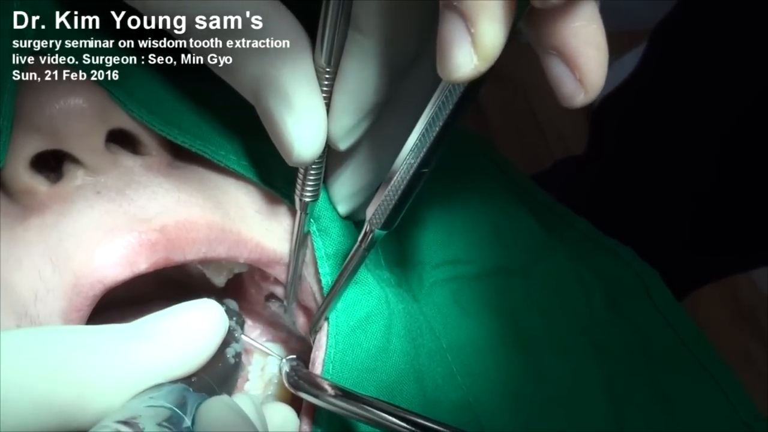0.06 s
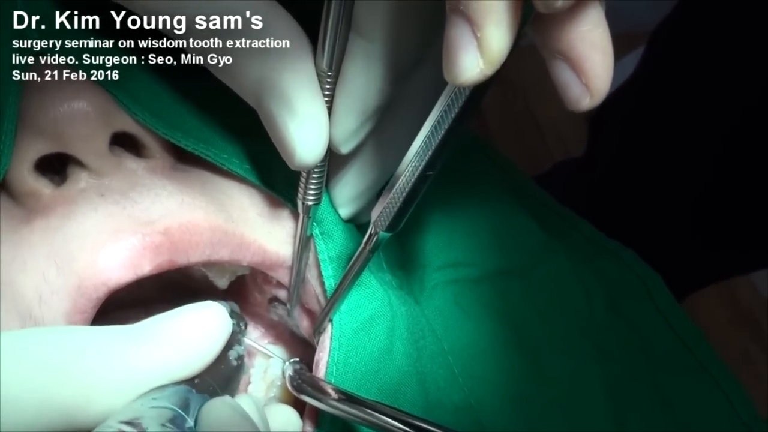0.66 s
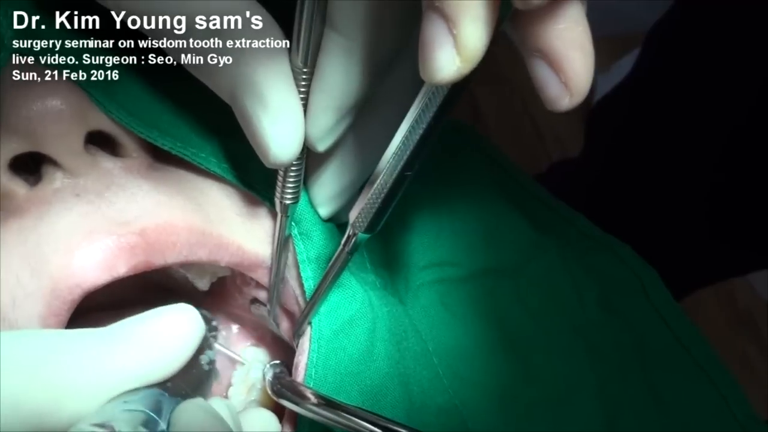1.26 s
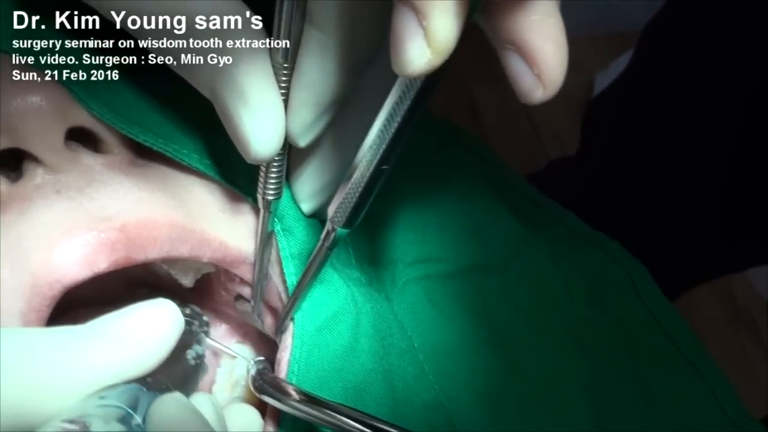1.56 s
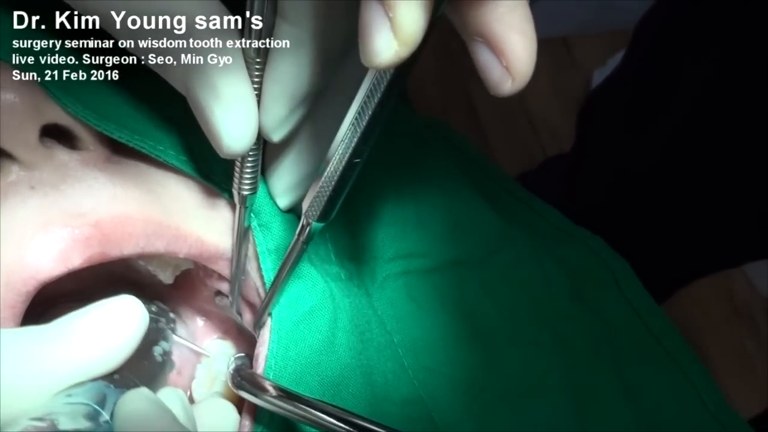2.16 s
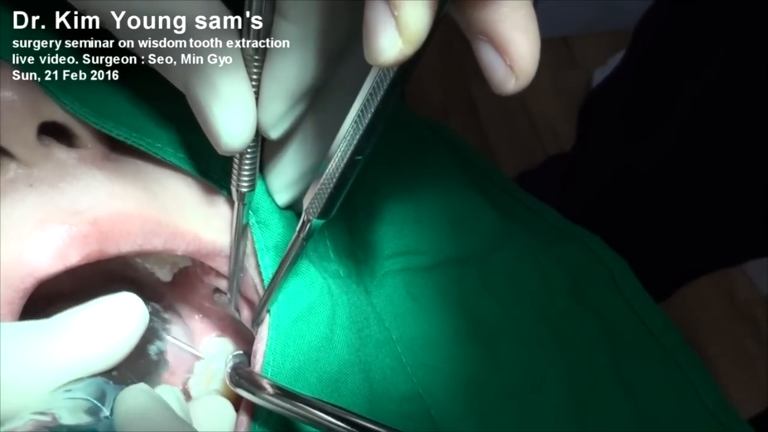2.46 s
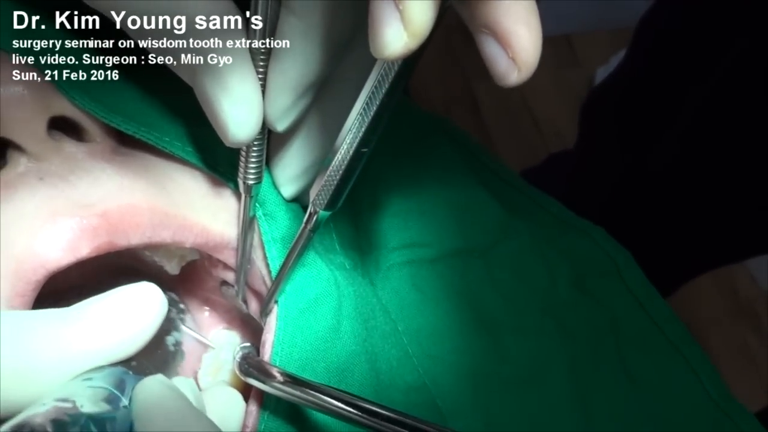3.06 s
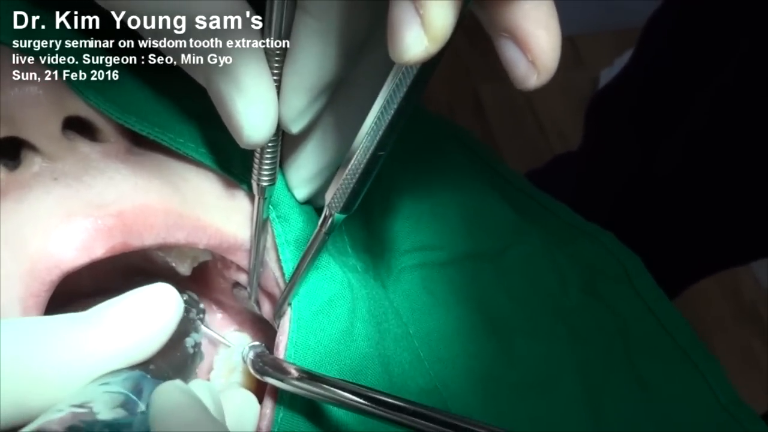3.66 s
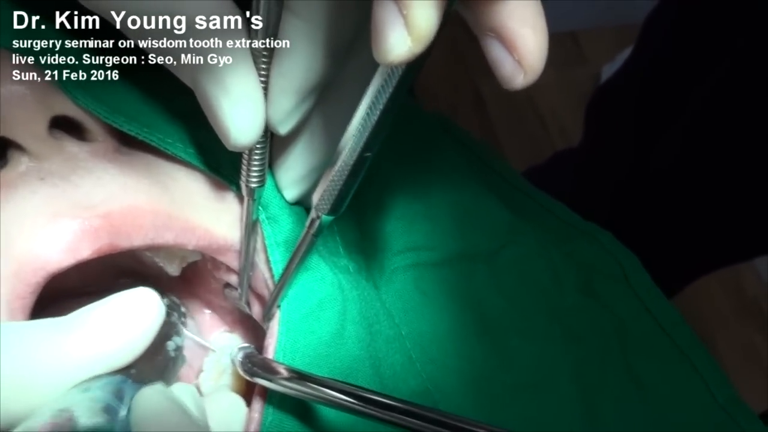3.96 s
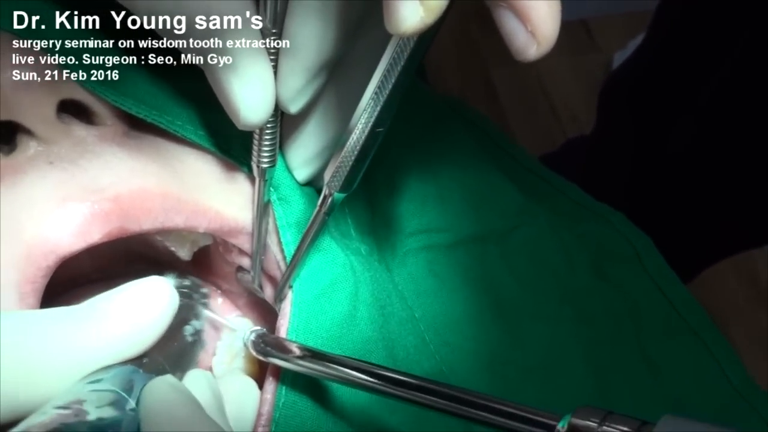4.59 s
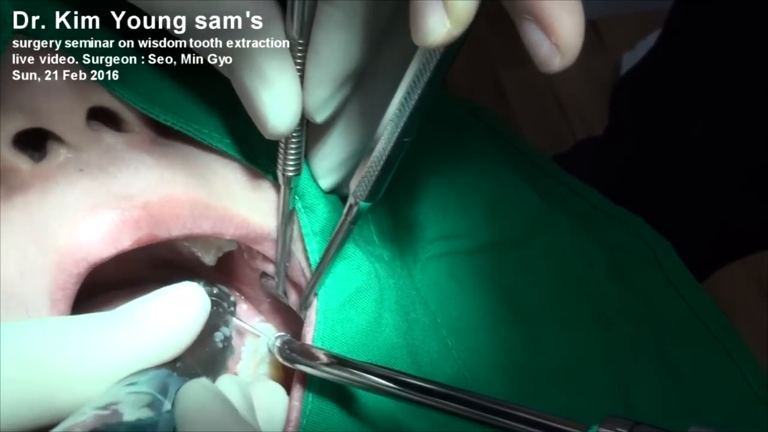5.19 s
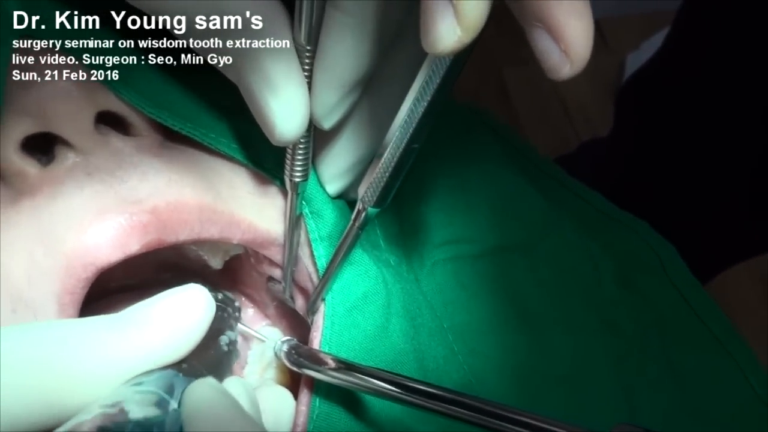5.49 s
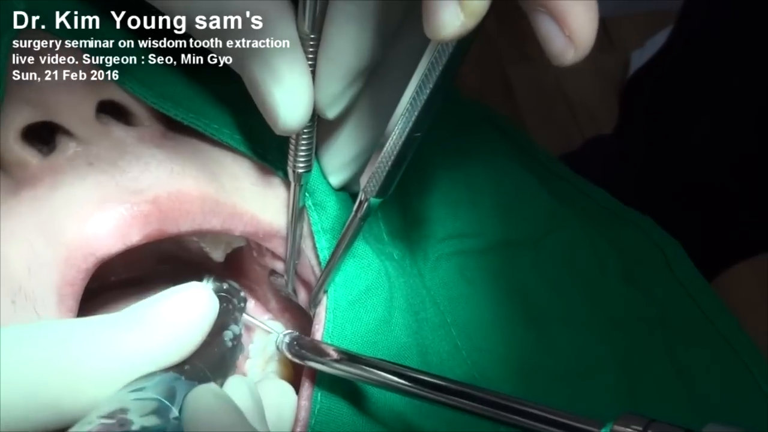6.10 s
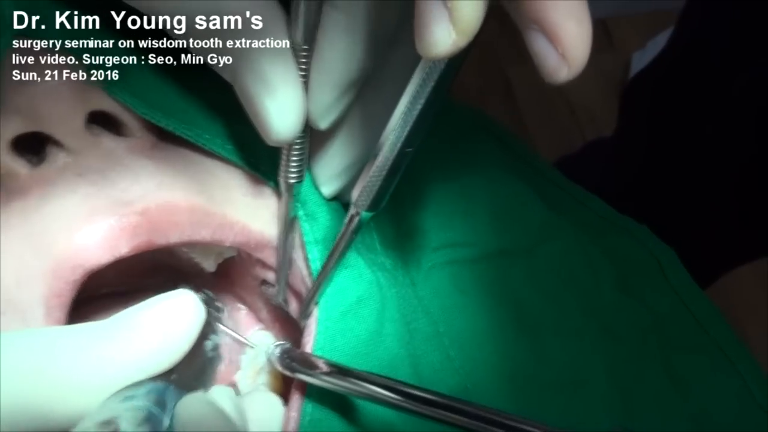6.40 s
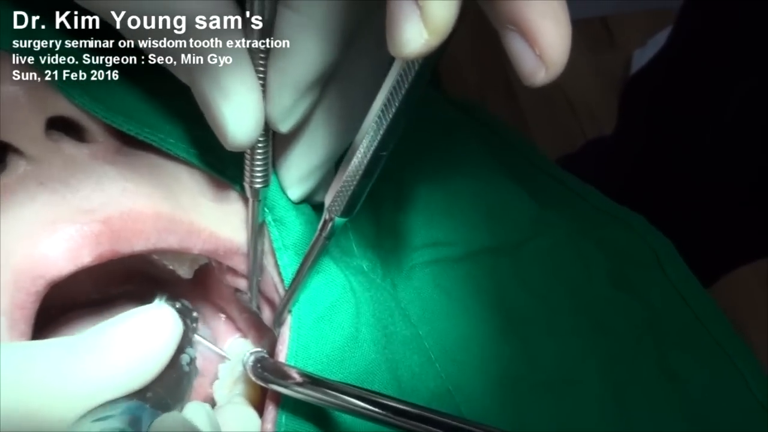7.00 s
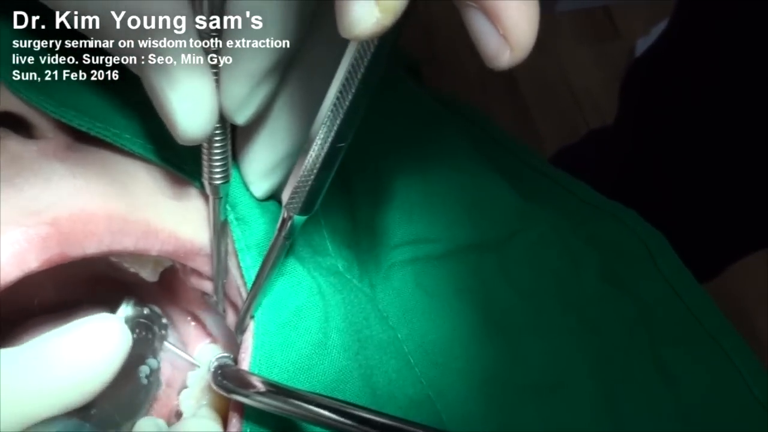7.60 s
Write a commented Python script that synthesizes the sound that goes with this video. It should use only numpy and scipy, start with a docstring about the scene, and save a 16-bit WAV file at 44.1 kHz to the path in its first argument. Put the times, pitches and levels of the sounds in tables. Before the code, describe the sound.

A dental drill whistles high and dips in pitch with each short stroke on a tooth, over steady suction roar and hissing spray.

```python
"""A suction tip roars in an open mouth under hissing air and spray, and at once a dental turbine whistles.
Its rotor runs near 5000 turns a second, sags with each short stroke of the bur and twice nearly stalls.
The bur chatters and rasps as it catches on enamel; passing water makes the suction flutter and gulp.
All is close and mono, over the low rush of a small surgery and the faint rumble of a handheld camera."""
import sys
import numpy as np
from scipy import signal
from scipy.fft import rfft, irfft, next_fast_len
from scipy.io import wavfile
from scipy.ndimage import uniform_filter1d, map_coordinates

SR = 44100
rng = np.random.default_rng(int(sys.argv[2]) if len(sys.argv) > 2 else 0)


def store_pcm(level_fs):
    """Save levels as 16-bit WAV."""
    pcm = np.round(np.clip(level_fs, -1, 1) * 32767).astype(np.int16)
    wavfile.write(sys.argv[1], SR, np.atleast_2d(pcm).T)


N = 346134
TIME = np.arange(N) / SR

# the bur catches on the tooth: centre_s, length_s, rasp_db, chatter_db
CATCHES = [(.41, .03, -40, -35), (0.758, .011, -33, -42), (1.127, .039, -22, -45), (1.218, .012, -31, -45),
           (1.37, .027, -29, -33), (1.699, 0.019, -17, -27), (1.964, 0.044, -38, -31),
           (2.06, 0.023, -32, -42), (2.533, 0.042, -26, -29), (2.85, .03, -36, -35), (3.097, .03, -38, -35),
           (3.998, 0.037, -16, -33), (4.021, 0.016, -23, -16), (4.06, .02, -28, -32),
           (4.481, 0.021, -36, -21), (4.543, .015, -21, -19), (4.582, 0.018, -14, -26),
           (4.611, .012, -9, -19), (5.128, .023, -23, -36), (5.21, .03, -38, -38), (5.363, 0.027, -17, -23),
           (5.612, 0.026, -17, -32), (5.678, 0.016, -18, -38), (5.785, 0.018, -36, -16),
           (5.988, 0.021, -38, -26), (6.45, .05, -20, -35), (6.591, .025, -36, -22),
           (6.76, 0.023, -36, -22), (6.984, .025, -18, -24), (7.245, 0.039, -19, -22),
           (7.315, .035, -34, -29), (7.54, .03, -20, -42), (7.742, .03, -38, -32), (7.83, .03, -36, -31)]


def amp(db):
    """Decibels to gain."""
    return 10 ** (np.asarray(db) / 20)


def unit(x):
    """Scale to rms 1."""
    return x / np.sqrt(np.mean(x ** 2) + 1e-20)


def eq_db(points, hz):
    """Read an EQ curve on a log frequency axis."""
    freq_hz, level_db = np.transpose(points)
    return np.interp(np.log(hz + 1), np.log(freq_hz + 1), level_db)


def faders(rows):
    """One fader ride for each column after the time."""
    time_s, *columns = np.transpose(rows)
    return [np.interp(TIME, time_s, column) for column in columns]


def wobble(rate):
    """A smooth random curve of rms 1, rate knots a second."""
    return unit(map_coordinates(rng.standard_normal(int(N * rate / SR) + 4), [TIME * rate]))


def swell(centre_s, length_s):
    """A bell-shaped envelope of height 1."""
    return np.exp(-2 * np.minimum(((TIME - centre_s) / length_s) ** 2, 20))


def swells(rest_db, rows):
    """A resting gain that swells at each centre_s, length_s, level_db."""
    return np.sqrt(amp(rest_db) ** 2 + sum((amp(db) * swell(s, length)) ** 2 for s, length, db in rows))


def filtered(x, response):
    """Filter x by a gain given as a function of Hz."""
    size = next_fast_len(N + SR // 2)
    return irfft(rfft(x, size) * response(np.fft.rfftfreq(size, 1 / SR)), size)[:N]


def rush(spectrum, patchy_db):
    """Turbulent noise of rms 1 whose colour drifts in patches."""
    bins = signal.stft(rng.standard_normal(N), nperseg=512)[2]
    patches = uniform_filter1d(rng.standard_normal(bins.shape), size=4, axis=0)
    patches = uniform_filter1d(patches, size=70, axis=1)
    noise = signal.istft(bins * amp(patchy_db * unit(patches)), nperseg=512)[1][:N]
    return unit(filtered(noise, lambda hz: amp(eq_db(spectrum, hz))))


def suction(roar_trim_db=-1, edge_trim_db=-.5, surge_db=.68):
    """Air drawn through the wet tip rings in two broad bands; passing water makes both surge and flutter."""
    # the hollow roar and its bright edge: freq_hz, level_db
    roar_eq = [(410, -60), (700, -25), (758, -26.5), (889, -11.5), (967, -11.5), (1060, -3), (1220, 2),
               (1410, -1), (1620, -9.5), (1850, -12.5), (1970, -19.5), (2120, -35), (2300, -34.5),
               (2990, -69), (5060, -120)]
    edge_eq = [(1380, -61), (2350, -42), (2440, -34), (2740, -2.5), (2860, 5.5), (2950, -1), (3130, -2.5),
               (3380, 2.5), (3480, -7.5), (3630, -24), (3750, -17.5), (4880, -41), (8250, -120)]
    # the pull of the tip: time_s, roar_db, edge_db
    pull = [(0, -23, -30), (.6, -22.5, -29), (1.3, -22, -27), (1.9, -20.5, -26.5), (2.2, -23, -28),
            (2.75, -21.5, -29), (3.05, -22.5, -30), (3.55, -21, -28), (4.1, -22, -28.5),
            (4.9, -23.5, -30.5), (5.6, -22.5, -29.7), (6.1, -24, -29), (6.55, -22, -28.5),
            (7.05, -23, -27.8), (7.85, -21, -27.5)]
    # gulps of water: centre_s, length_s, roar_lift_db, edge_lift_db
    gulps = [(1.457, 0.021, 3.5, 2), (1.596, 0.015, 5, 10), (1.818, .025, 5, 1), (2.277, 0.017, 6.5, 6.5),
             (2.406, .03, 3, 4), (2.559, .02, 4.5, 2), (2.708, 0.027, 3.5, 2), (3.204, 0.029, 5.5, 4),
             (4.139, 0.027, 4, 2.5), (5.699, .015, 6, -3), (5.79, 0.014, 5.5, 4.5), (5.986, 0.021, 6.5, 4),
             (6.58, 0.035, 4, 2)]
    roar_db, edge_db = faders(pull)
    surge = surge_db * wobble(25)
    roar_db += surge + sum(db * swell(s, length) for s, length, db, _ in gulps)
    edge_db += surge + sum(db * swell(s, length) for s, length, _, db in gulps)
    flutter_db = .5 * wobble(130)
    roar = unit(rush(roar_eq, patchy_db=.5) * amp(flutter_db))
    edge = unit(rush(edge_eq, patchy_db=1.33) * amp(flutter_db + .74 * wobble(90)))
    return amp(roar_db + roar_trim_db) * roar + amp(edge_db + edge_trim_db) * edge


def jets(hiss_trim_db=-1, spray_trim_db=4, ring_trim_db=-2):
    """Drive air leaves the head as a smooth hiss; cooling spray sputters above it."""
    # air hiss, narrow ring and water spray: freq_hz, level_db
    hiss_eq = [(2150, -34), (3650, -9.5), (3740, -19), (3950, -13), (4440, -7), (4870, -0.5), (5290, -4),
               (6780, -3.5), (7480, -9.5), (7800, -22.5), (10100, -36), (17200, -120)]
    ring_eq = [(4600, -37), (4820, -8), (4930, 4), (5010, 1), (5120, -30), (5400, -60)]
    spray_eq = [(4470, -45), (7600, -0.5), (7890, -8), (9480, 0.5), (10800, 1.5), (11900, -5.5),
                (14600, 0.5), (15400, 0.5), (16000, -11)]
    # flow from the head: time_s, hiss_db, spray_db
    flow = [(0, -25.5, -30), (1.1, -23.5, -29), (2.05, -24, -27), (2.45, -23.5, -28.5), (3.1, -22.5, -26.3),
            (3.75, -22.6, -27.5), (4.25, -23.5, -28.5), (4.55, -22.5, -26.5), (4.8, -24.5, -30),
            (5.5, -23.5, -28.5), (6.25, -23, -27.2), (7.0, -23, -28.5), (7.85, -23.5, -27)]
    # a narrow ring near 5 kHz comes and goes: time_s, level_db
    ring_ride = [(0, -29.5), (1.2, -33), (2.3, -38), (3.0, -53), (4.4, -37), (5.0, -52), (6.8, -43),
                 (7.4, -35), (7.85, -34)]
    hiss_db, spray_db = faders(flow)
    ring_db, = faders(ring_ride)
    hiss = amp(hiss_db + hiss_trim_db + .71 * wobble(30)) * rush(hiss_eq, patchy_db=1.27)
    ring = amp(ring_db + ring_trim_db) * rush(ring_eq, patchy_db=-1)
    sputter = amp(wobble(30) + .97 * wobble(500))
    spray = amp(spray_db + spray_trim_db) * unit(rush(spray_eq, patchy_db=2.24) * sputter)
    return hiss + ring + spray


def room_tone(level_db=-41):
    """The low, steady rush of the surgery."""
    # the room's colour: freq_hz, level_db
    room_eq = [(35, -36), (60, -11), (98, -14.5), (161, -10), (216, -4.5), (286, -7), (315, -2.5),
               (441, 2.5), (617, 1), (651, 0), (695, -2.5), (750, -10.5), (800, 2), (1040, -34),
               (1760, -120)]
    return amp(level_db) * rush(room_eq, patchy_db=1.2)


def handling(sway_trim_db=-1, rub_trim_db=-3):
    """The camera rumbles softly, swelling when the hand shifts on it."""
    # deep sway and low rub: freq_hz, level_db
    sway_eq = [(15, -3), (35, 2), (55, -19), (120, -50)]
    rub_eq = [(25, -23), (55, 6), (90, -11), (130, -3), (220, -26), (500, -80)]
    # shifts of the hand: centre_s, length_s, sway_db, rub_db
    bumps = [(.01, .04, -50, -44), (1.382, .05, -62, -46), (1.6, 0.13, -56, -50), (2.509, 0.048, -60, -50),
             (3.411, 0.044, -62, -50), (4.44, 0.058, -57, -48), (5.511, .03, -58, -57),
             (6.06, .05, -52, -51), (6.21, 0.031, -46, -57), (6.41, .05, -39, -56), (6.902, .06, -52, -43),
             (7.12, 0.058, -52, -37)]
    sway = swells(-64, [(s, length, db) for s, length, db, _ in bumps]) * rush(sway_eq, patchy_db=-.5)
    rub = swells(-60.5, [(s, length, db) for s, length, _, db in bumps]) * rush(rub_eq, patchy_db=2)
    return amp(sway_trim_db) * sway + amp(rub_trim_db) * rub


def standing_waves(x):
    """Standing waves lift and hollow narrow bands of the noise."""
    # peaks and notches of tube, mouth and room: centre_hz, width_hz, gain_db
    modes = [(205, 25, 2.5), (251, 30, 3.5), (722, 29, 7), (807, 24, 1.5), (899.4, 47, 6), (1097, 20, 0.5),
             (1178, 98, 2.5), (1379, 27, 4), (1530, 49, 1.5), (1880, 70, 2), (2566, 22, 8.5), (2930, 43, 5),
             (3624, 124, -10), (4017, 300, 6.5), (4970, 115, 1.5), (5190, 120, -8.5), (6600, 210, 3.5),
             (7570, 170, -12.5), (7940, 190, 3), (12850, 170, 0), (13900, 120, 2), (15100, 350, -2)]
    return filtered(x, lambda hz: amp(sum(db / (1 + (2 * (hz - centre) / width) ** 2)
                                          for centre, width, db in modes)))


def strokes(ease_db=11, fade_db_per_s=76, shaft_drop_db=6, full_load_sag_hz=800):
    """Each stroke drags the rotor down, each pause frees it. Gives speed_hz, whistle_db, shaft_db."""
    # cuts of the bur: start_s, length_s, fast_hz, slow_hz, lateness (of the sag, 1 = even),
    # touch_db, bite_db (whistle at first touch and full bite), shaft_db (once-a-turn tone)
    cuts = [(0.042, 0.22, 5000, 4920, .7, -30, -24, -28), (0.365, 0.22, 5230, 3300, 0.89, -28, -27.5, -33),
            (.76, 0.15, 5530, 3880, 0.77, -26, -26, -31), (1.033, 0.13, 5290, 3660, 1, -29, -27, -36),
            (1.277, 0.12, 5300, 4240, 1.1, -43, -22.5, -32), (1.553, 0.15, 5300, 3380, 1, -34, -25.5, -38),
            (1.87, 0.15, 5170, 3740, 0.82, -33, -23.5, -37), (2.146, 0.19, 5010, 4220, 1.3, -26, -25, -38),
            (2.47, 0.15, 5650, 4660, 0.91, -22.5, -23, -45), (2.741, .11, 5820, 4920, 1.1, -40, -20, -46),
            (2.972, .13, 5700, 4850, 1.1, -28, -25, -48), (3.196, 0.13, 5550, 4870, 1.2, -34, -25, -41),
            (3.418, .1, 5430, 4650, 1.2, -23.5, -19, -36), (3.542, 0.076, 4350, 4300, 0.52, -31, -18, -50),
            (3.777, 0.23, 5190, 3650, 1.65, -22, -19.5, -44),
            (3.999, 0.039, 3330, 1780, 1.2, -28, -26, -50), (4.285, 0.11, 5420, 5210, 0.84, -27, -24, -38),
            (4.442, .2, 5370, 900, 1.2, -22, -22, -28.5), (4.958, .12, 5620, 3940, 1.3, -40, -16, -39),
            (5.311, .1, 5710, 3960, 1.3, -42, -23, -40), (5.566, .096, 5570, 3920, 1.2, -24.5, -22.5, -34),
            (5.879, 0.063, 5350, 4720, 1.1, -29, -28, -36), (6.02, 0.081, 5250, 5060, .8, -22.5, -34, -38),
            (6.153, .06, 5390, 5230, .8, -38, -23, -27), (6.302, .13, 5430, 3450, 1.3, -31, -18, -30),
            (6.707, .064, 5600, 4980, 1.1, -40, -25, -30), (6.899, .18, 5850, 3960, 1.1, -41, -24, -34),
            (7.2, 0.12, 5430, 3890, 1.07, -30, -24, -35), (7.489, 0.12, 5560, 3930, 1.2, -41, -22, -29),
            (7.738, 0.11, 4980, 4420, 0.91, -46, -22.5, -34)]
    start, length, fast, slow, lateness, touch_db, bite_db, shaft_db = np.transpose(cuts)
    end = start + length
    pause = np.maximum(np.append(start[1:], end[-1] + 1) - end, 1e-3)
    bite, lift, next_touch = start + .51 * length, end + .26 * pause, end + .74 * pause
    now = np.maximum(np.searchsorted(start, TIME) - 1, 0)

    def glide(since, span, bend):
        progress = np.clip((TIME - since[now]) / span[now], 0, 1)
        return np.sin(np.pi / 2 * progress ** bend) ** 2

    def envelope(times, levels):
        return np.interp(TIME, np.ravel(times, order="F"), np.ravel(levels, order="F"))

    sag = (fast - slow)[now] * glide(start, length, lateness[now])
    spin_up = (np.append(fast[1:], fast[-1]) - slow)[now] * glide(end, pause, bend=.8)  # picks up early
    end_db = bite_db - ease_db
    lift_db = end_db - fade_db_per_s * pause  # the longer the pause, the fainter
    whistle = envelope([start, bite, end, lift, next_touch],
                       [touch_db, bite_db, end_db, lift_db, np.roll(touch_db, -1) - 2.5])
    loaded_db = shaft_db - shaft_drop_db * np.minimum((fast - slow) / full_load_sag_hz, 1)
    shaft = envelope([start, end, next_touch], [shaft_db, loaded_db, np.roll(shaft_db, -1)])
    return fast[now] - sag + spin_up, whistle, shaft


def turbine(free_hz=5600, whirl_hz=4300, whistle_trim_db=-.5, chatter_trim_db=1, shaft_trim_db=-1):
    """The rotor whistles at twice its speed; load roughens it, and catches bring up higher orders."""
    # the whirling bur's rattle: freq_hz, level_db
    rattle_eq = [(6000, -50), (8000, -14), (8500, 0), (8800, 0), (9300, -14), (12000, -50)]
    # the bur's chatter: order (multiple of rotor speed), level_db
    partials = [(3, -8), (4, -6), (6, -2)]
    # how well the head radiates the chatter: freq_hz, gain_db
    head_eq = [(5000, -18), (7500, -6), (9000, 5), (10800, -11), (12500, 4), (15000, -7.5), (17000, -7),
               (22000, -27)]
    speed, whistle_db, shaft_db = strokes()
    labour_db = 16 * np.minimum(np.log2(speed / 3900), 0)  # a labouring rotor whistles more weakly
    load = np.clip(1 - speed / free_hz, 0, .4)
    shake = .004 * wobble(45) + .002 * wobble(150) + .03 * load * wobble(1200)
    angle = 2 * np.pi * np.cumsum(speed * (1 + shake)) / SR
    tone = lambda order: np.sqrt(2) * np.sin(order * angle) * (order * speed < SR / 2)
    shaft = amp(shaft_db + shaft_trim_db) * tone(1)
    # near its critical speed the bur whirls and the whistle breaks into a louder rattle
    whirl = .55 * np.exp(-((speed - whirl_hz) / 170) ** 2)
    whistle = np.sqrt(1 - whirl) * tone(2) + np.sqrt(whirl) * rush(rattle_eq, patchy_db=0)
    whistle *= amp(whistle_db + labour_db + 5 * whirl + whistle_trim_db)
    weights = np.array([amp(db + eq_db(head_eq, order * speed)) for order, db in partials])
    weights /= np.linalg.norm(weights, axis=0)
    chatter = sum(weight * tone(order) for weight, (order, _) in zip(weights, partials))
    chatter *= amp(chatter_trim_db) * swells(-42, [(s, length, db) for s, length, _, db in CATCHES])
    contact = unit(amp(4 * np.tanh(wobble(60)) + (1.5 + 11 * load) * np.tanh(wobble(900))))
    # the small head radiates little below 4 kHz
    return filtered((shaft + whistle + chatter) * contact, lambda hz: hz ** 6 / (hz ** 6 + 4000 ** 6))


def reflections(x, decay_s=.05):
    """Hands, face and instruments add a very short tail, so a gliding tone flickers."""
    t = np.arange(SR // 8) / SR
    tail = rng.standard_normal(len(t)) * amp(-60 * t / decay_s)
    return .92 * x + .4 * signal.fftconvolve(x, tail / np.linalg.norm(tail))[:N]


def scrapes():
    """The bur's flutes catch on enamel in brief, grainy rasps that squeal on the rotor's high orders."""
    # the rasp's colour: freq_hz, level_db
    rasp_eq = [(2000, -60), (4000, -20), (8000, -11), (11000, -11), (13000, -2), (14500, -1), (15700, 3),
               (17000, -10)]
    speed = strokes()[0]
    strength = sum(amp(db) * swell(s, length) for s, length, db, _ in CATCHES)
    angle = 2 * np.pi * np.cumsum(speed) / SR
    orders = np.arange(3, 9)[:, None]
    weights = amp(eq_db(rasp_eq, orders * speed)) / (1 + (orders * speed / 15000) ** 40)
    squeal = sum(weight * wobble(1400) * np.sqrt(2) * np.sin(order * angle)
                 for order, weight in zip(orders, weights))
    grit = unit(rush(rasp_eq, patchy_db=2.5) * amp(3 * wobble(700)))
    return strength * (.65 * grit + .8 * squeal)


def scene():
    """The drill over its bed of air noise, the same in both channels."""
    drill = reflections(turbine()) + scrapes()
    bed = standing_waves(suction() + jets() + room_tone() + handling())
    return np.array([drill + bed] * 2)


def record(dry, ceiling=.75, top_hz=15750):
    """A soft ceiling rounds off the loudest peaks of the bur's chatter; nothing passes above top_hz."""
    rounded = dry / (1 + (dry / ceiling) ** 8) ** (1 / 8)
    return np.array([filtered(channel, lambda hz: hz < top_hz) for channel in rounded])


dry = scene()
out = record(dry)
store_pcm(out)
```